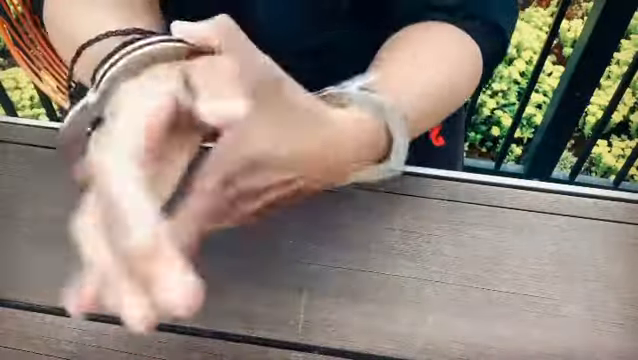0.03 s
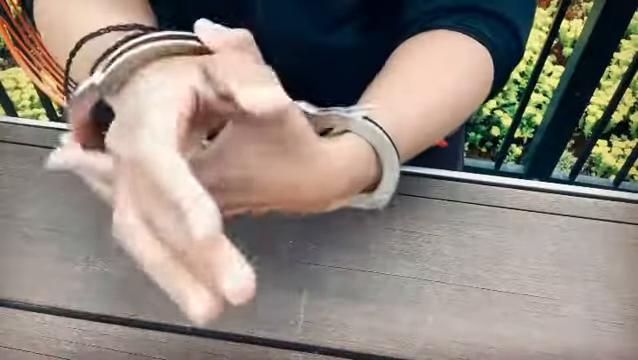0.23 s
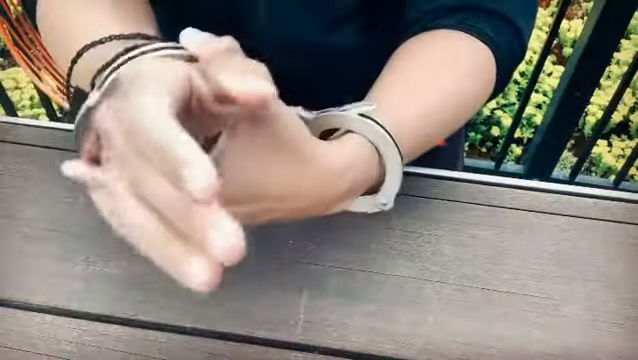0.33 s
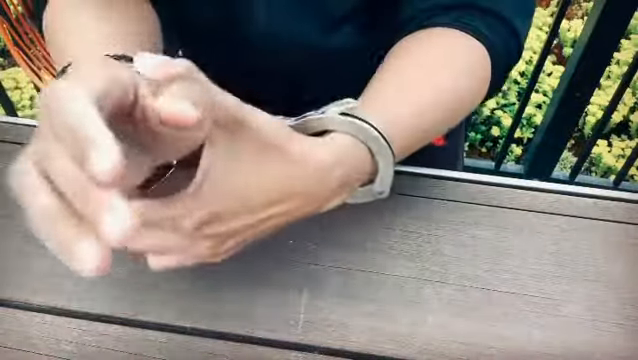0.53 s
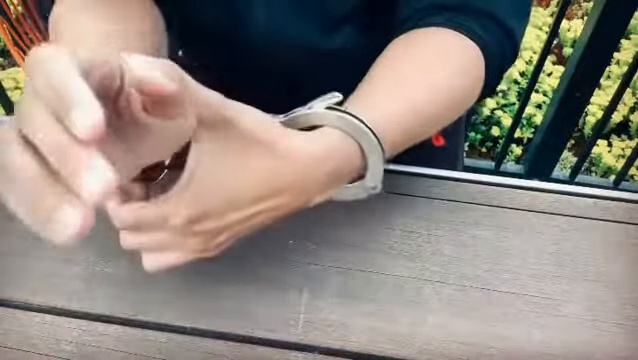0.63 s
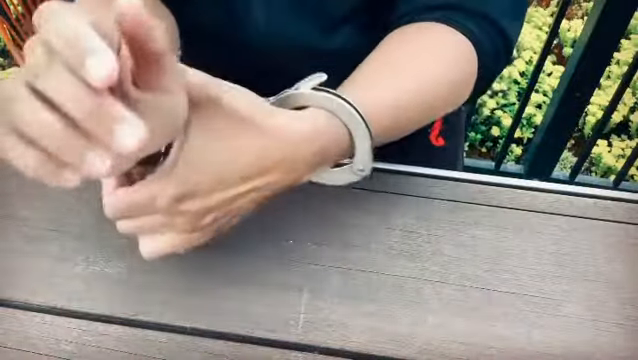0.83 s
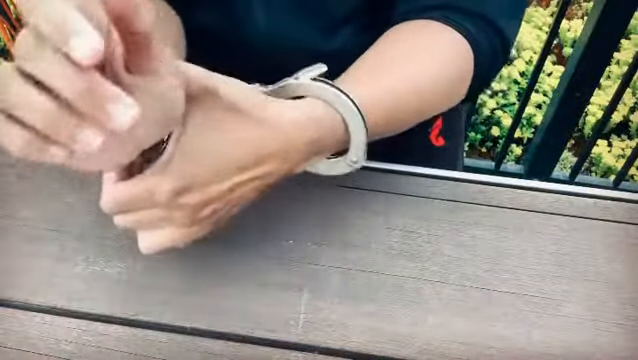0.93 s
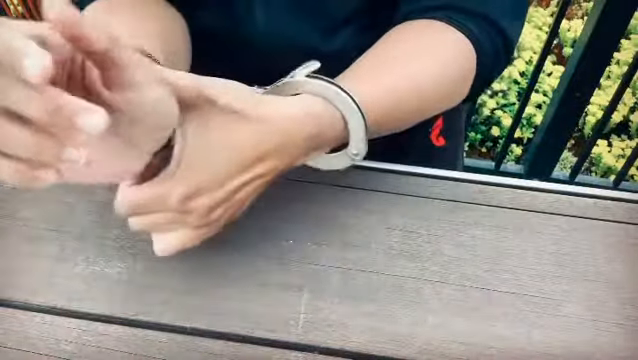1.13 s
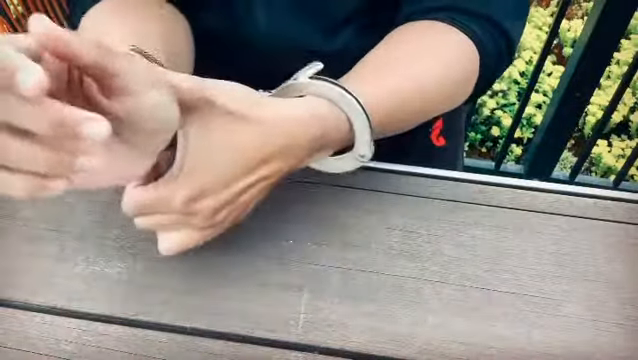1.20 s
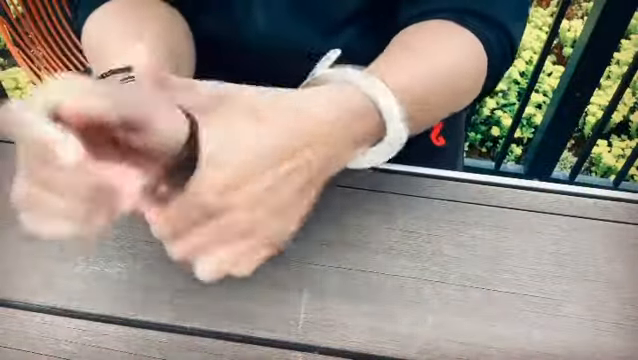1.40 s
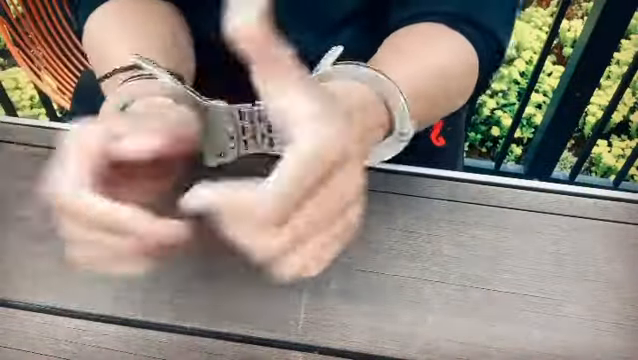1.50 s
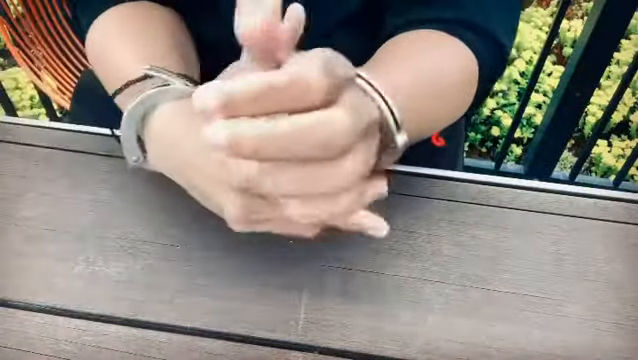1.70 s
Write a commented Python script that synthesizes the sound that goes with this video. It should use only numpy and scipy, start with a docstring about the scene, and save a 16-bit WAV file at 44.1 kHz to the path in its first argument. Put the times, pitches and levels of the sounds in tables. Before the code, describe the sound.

Steel handcuff clicks rattle off in fast dry bursts, with faint hinge ticks between, outdoors

```python
"""Handcuff ratchet clicks.

Steel handcuffs on moving wrists above a wooden table outdoors, close to a small microphone.
Pawl clicks: slide, snap and chatter noise rings steel modes; a low crack and table modes add the knock.
Hinge: sparse ticks through the same modes, plus lone decaying sine pings. Steel gets a short noise echo.
Background: flickering noise bands for outdoor air, wavering sine tones for a distant machine hum.
"""
import sys
import numpy as np
from scipy import signal
from scipy.io import wavfile
from scipy.ndimage import uniform_filter1d

SR = 44100
rng = np.random.default_rng(int(sys.argv[2]) if len(sys.argv) > 2 else 0)


def master(y):
    """Save y as 16-bit WAV."""
    cut = np.clip(np.atleast_2d(y).T, -1, 1)
    pcm = np.round(cut * 32767)  # scale
    wavfile.write(sys.argv[1], SR, pcm.astype(np.int16))


N = 77175

# ratchet clicks: strike_s, treble_db, mid_db, crack_db, knock_db, brightest_hz, chatter_s
CLICKS = [(0.23, -20, -28, -29, -23.0, 5720, 0.0048), (0.2378, -16.5, -32, -22.5, -17.5, 6000, 0.0039),
          (0.2479, -21.5, -23.5, -26.0, -24, 6200.0, 0.0054),
          (0.265, -18, -23.5, -34.5, -32.0, 6520.0, 0.0063),
          (0.2732, -17, -28.5, -41, -32.0, 6480.0, 0.0055), (0.2826, -21.5, -27, -46, -36.5, 6100, 0.0049),
          (0.2945, -19.5, -29.5, -36, -31.5, 6250.0, 0.0054), (0.305, -17.5, -37, -34.5, -27, 5870, 0.0047),
          (0.3179, -23, -31.5, -44.5, -40, 6180, 0.0048), (0.3295, -18.5, -30, -45, -51.5, 6770, 0.0058),
          (0.3398, -15, -29.5, -52, -56, 6450.0, 0.0052), (0.3494, -13, -37.5, -61, -54.5, 6460.0, 0.0064),
          (0.3582, -17.5, -32.5, -57.5, -62.5, 6360.0, 0.0061),
          (0.388, -17.5, -30.5, -57.5, -55, 6570, 0.0063),
          (0.5304, -26.5, -36.5, -60.5, -63, 6210.0, 0.0054), (0.537, -21, -34, -51.5, -67, 6370.0, 0.0054),
          (0.5424, -17.5, -33.5, -50, -70, 6240.0, 0.0042),
          (0.5495, -18.5, -30.5, -46.5, -68, 6130.0, 0.0068),
          (0.5616, -18.5, -33, -47.5, -55, 6060, 0.0056), (0.6026, -19.5, -29.5, -60, -54, 6250.0, 0.0044),
          (0.9724, -21, -27.5, -68, -54, 6370.0, 0.0057), (0.9808, -21, -28, -52.5, -54.5, 6140.0, 0.0047),
          (1.0115, -20, -27.5, -42, -47.5, 6080, 0.0062), (1.0222, -17.5, -28, -32, -36.5, 7030, 0.0075),
          (1.048, -20, -24, -37.5, -50, 6360, 0.0089), (1.0592, -15, -26.5, -41.5, -43.5, 6600, 0.0054),
          (1.0836, -19, -24.5, -46.5, -61.5, 6660, 0.0054), (1.1206, -20, -30, -53.5, -50, 6600, 0.0067)]
# faint hinge rustles: start_s, length_s, level_db, brightest_hz
RUSTLES = [(.005, 0.0086, -53.5, 6300), (0.022, 0.054, -67.5, 6240), (0.055, .005, -47.5, 6300),
           (0.062, 0.011, -55.5, 6200), (0.072, 0.0066, -45.5, 6200), (.083, 0.0035, -43, 6300),
           (.088, 0.0098, -51.5, 6500), (0.217, 0.004, -54.5, 5960), (0.959, 0.017, -57, 5030),
           (1.106, .008, -52, 6530), (1.111, .004, -37, 6740), (1.115, 0.0017, -30.5, 6450),
           (1.123, 0.011, -42, 6330), (1.241, 0.0037, -56.5, 6070), (1.26, 0.032, -68, 6050),
           (1.295, .004, -53, 6000), (1.32, .008, -46, 6900), (1.328, 0.0074, -47, 6700),
           (1.335, .005, -41.5, 6400), (1.343, .010, -53.5, 6440)]
# cuff modes before scatter and grip: pitch_hz, relative_db, t60_s
CUFF_MODES = [(2080, -23.5, .008), (2600, -13.5, 0.0027), (3025, -13, 0.0039), (3390, -10.5, .006),
              (3750, -11, 0.0087), (4210, -11, 0.0026), (4880, -9.5, 0.0085), (5360, -8.5, 0.0058),
              (5914, -4, 0.0092), (6100, -6, 0.0069), (6530, -0.5, 0.01), (6747, 0, 0.0044),
              (6984, -1, 0.021), (7403, -1, 0.0026)]
# table top modes: pitch_hz, relative_db, t60_s
TABLE_MODES = [(115, -1.5, .04), (172, 2.5, 0.041), (280.4, 0, 0.031), (383, -10.5, 0.036),
               (560, 0.5, 0.0092), (750, -3, .01), (950, -13, .008)]
# lone hinge pings: start_s, pitch_hz, level_db (before fade-in), t60_s
PINGS = [(.004, 1760, -50.5, 0.046), (.004, 2180, -61.5, 0.21), (.006, 4630, -58, 0.084),
         (.075, 1670, -55, 0.29), (.088, 3790, -51, 0.051), (1.244, 6170, -37, 0.024),
         (1.244, 4200, -52, .015), (1.253, 3970, -65, .1), (1.293, 5730, -43, 0.048),
         (1.293, 6270, -35, 0.02), (1.334, 4900, -46, .04)]
# outdoor noise spectrum: pitch_hz, relative_db (per Hz)
AIR = [(30, -29.5), (60, -18.5), (100, -9), (200, -10), (350, -1.5), (650, -7), (900, -14.5), (2000, -22.5),
       (4500, -38.5), (6800, -25.5), (9000, -55)]
# machine hum tones: pitch_hz, drift_hz (rms), level_db (rms)
HUM = [(344.7, 3, -63), (568.7, 11, -62.5), (679, 4, -62.5), (205.3, 12, -70)]

# pawl slides off the tooth and strikes
LEAD_S, SLIDE_S, SNAP_S, SNAP_FALL_S = 0.002, 0.0006, 0.00046, 0.0004
SLIDE_DB, STRIKE_DB, EDGE_DB = -14.5, 13.5, -19  # edge: unringing, re treble
# pawl chatters until it seats
CHATTER_DB, CHATTER_FALL_DB, CHATTER_PATCHY_DB, MID_CHATTER_DB = -7.5, 14.5, 4, -18
SEAT_S = 0.0008
# steel ring
SPLIT_HZ, STEEL_LOW_HZ = 4500, 1820  # mid/treble split; the steel carries little below this
BRIGHT_DB, BRIGHT_WIDTH_HZ = 5.5, 460
MODE_SCATTER_DB, MODE_JITTER_RATIO, GRIP_T60_S = 1.5, 0.025, 0.0065
# table crack and knock
CRACK_HZ, CRACK_WIDTH_HZ, KNOCK_PUSH_S = 1200, 680, 0.0004
# durations over which burst levels hold
CLICK_LEVEL_S, KNOCK_LEVEL_S = 0.0057, 0.008
# hinge
RUSTLE_TICKS_PER_S, RUSTLE_SCATTER_DB, RUSTLE_MID_DB = 2200, 3, -7
# short echoes from table and railing
TAIL_DB, TAIL_T60_S = -28, 0.12
TAIL_MID_HZ, TAIL_MID_WIDTH_HZ, TAIL_MID_DB = 2400, 1500, 23.5
# background
AIR_DB, AIR_FLICKER_DB, HUM_WAVER_DB = -56, 2, 3.5
# recording chain
BASS_CUT_HZ, ROLL_HZ, LEAK_DB, TOP_HZ = 60, 7286, -27, 8500


def undb(db):
    """Decibels to amplitude ratio."""
    return 10 ** (np.asarray(db) / 20)


def level(x, db):
    """Scale x to an rms level in dB."""
    return x * undb(db) / np.sqrt(np.mean(x ** 2))


def burst(x, db, length_s):
    """Scale x so that its energy spread over length_s has rms level db."""
    return x * undb(db) * np.sqrt(length_s * SR / np.sum(x ** 2))


def band(x, hz, width_hz):
    """Resonant band-pass."""
    return signal.lfilter(*signal.iirpeak(hz, hz / width_hz, fs=SR), x)


def two_pass_band(x, hz, width_hz):
    """Same resonance twice in series, for steeper skirts."""
    return band(band(x, hz, width_hz), hz, width_hz)


def slow_noise(shape, window):
    """Twice-smoothed noise at unit rms."""
    x = rng.standard_normal(shape)
    return level(uniform_filter1d(uniform_filter1d(x, window), window), 0)


def add(out, start_s, x):
    """Mix x into out at start_s."""
    i = int(start_s * SR)
    out[i:i + len(x)] += x[:N - i]


def ring(modes, extra_db, phase=0.):
    """Impulse responses of exponentially decaying sine modes, one row each."""
    hz, db, t60_s = np.array(modes, float).T[:, :, None]
    t = np.arange(4096) / SR
    gain = undb(db + np.reshape(extra_db, (-1, 1)))
    decay = np.exp(-np.log(1000) * t / t60_s)
    return gain * decay * np.sin(2 * np.pi * hz * t + phase)


def cuff_ring(bright_hz):
    """Mid and treble steel responses: boosted near bright_hz, damped by grip, scattered per call."""
    modes = np.array(CUFF_MODES, float)
    count = len(modes)
    hz = modes[:, 0].copy()
    boost_db = BRIGHT_DB * np.exp(-((hz - bright_hz) / BRIGHT_WIDTH_HZ) ** 2)
    modes[:, 0] *= 1 + MODE_JITTER_RATIO * rng.standard_normal(count)
    modes[:, 2] = np.minimum(modes[:, 2], GRIP_T60_S)
    rows = ring(modes, boost_db + MODE_SCATTER_DB * rng.standard_normal(count))
    rows *= (-1.) ** np.arange(count)[:, None]  # alternate polarity
    return rows[hz < SPLIT_HZ].sum(axis=0), rows[hz >= SPLIT_HZ].sum(axis=0)


def chatter_envelope(t, length_s):
    """Pawl bounce after the strike: falling, patchy gain until length_s."""
    patches = level(uniform_filter1d(rng.standard_normal(len(t)), 40), 0)
    gain_db = CHATTER_DB - CHATTER_FALL_DB * t / length_s + CHATTER_PATCHY_DB * patches
    return (t > 0) * (t < length_s) * undb(gain_db)


def table_knock(t):
    """A short smooth push drives the table top modes."""
    push = np.exp(-(t / KNOCK_PUSH_S - 1) ** 2)
    table = ring(TABLE_MODES, np.zeros(len(TABLE_MODES)), np.pi / 2).sum(axis=0)
    return signal.fftconvolve(push, table)


def clicks():
    """Slide, snap and chatter ring the steel at each tooth; crack and knock go into the table."""
    steel, wood = np.zeros(N), np.zeros(N)
    t = np.arange(640) / SR - LEAD_S  # zero at the strike
    knock = table_knock(t)
    rise = np.minimum(t, 0) / SLIDE_S
    fall = np.maximum(t - SNAP_S, 0) / SNAP_FALL_S
    snap = np.exp(rise - fall) * undb(SLIDE_DB * (t < 0))
    for strike_s, treble_db, mid_db, crack_db, knock_db, bright_hz, chatter_s in CLICKS:
        start_s = strike_s - LEAD_S
        noise = rng.standard_normal(640)
        noise[int(LEAD_S * SR)] = undb(STRIKE_DB)
        chatter = chatter_envelope(t, chatter_s)
        seat = np.exp(-np.maximum(t - chatter_s, 0) / SEAT_S)  # seated pawl stills the ring
        mid_ring, treble_ring = cuff_ring(bright_hz)

        treble = signal.fftconvolve((snap + chatter) * noise, treble_ring)[:640] * seat
        mid_drive = (snap + undb(MID_CHATTER_DB) * chatter) * noise
        mid = signal.fftconvolve(mid_drive, mid_ring)[:640] * seat
        edge = np.diff(snap * noise)
        crack = two_pass_band(snap * noise, CRACK_HZ, CRACK_WIDTH_HZ)

        add(steel, start_s, burst(treble, treble_db, CLICK_LEVEL_S))
        add(steel, start_s, burst(mid, mid_db, CLICK_LEVEL_S))
        add(steel, start_s, burst(edge, treble_db + EDGE_DB, CLICK_LEVEL_S))
        add(wood, start_s, burst(crack, crack_db, CLICK_LEVEL_S))
        add(wood, start_s, burst(knock, knock_db, KNOCK_LEVEL_S))
    high_pass = signal.butter(6, STEEL_LOW_HZ, "high", fs=SR, output="sos")
    return signal.sosfilt(high_pass, steel), wood


def rustles():
    """Tiny random ticks of sliding steel ring the cuff modes."""
    out = np.zeros(N)
    for start_s, length_s, level_db, bright_hz in RUSTLES:
        chance, size = rng.random((2, 2048))
        ticks = (chance < RUSTLE_TICKS_PER_S / SR) * undb(-RUSTLE_SCATTER_DB * np.log(size + 1e-9))
        ticks[0] = 1  # at least one tick
        ticks *= np.exp(-(np.arange(2048) / (length_s * SR)) ** 3)
        mid_ring, treble_ring = cuff_ring(bright_hz)
        rustle = signal.fftconvolve(ticks, treble_ring + undb(RUSTLE_MID_DB) * mid_ring)
        add(out, start_s, burst(rustle, level_db, length_s))
    return out


def pings():
    """Single decaying hinge modes with a short linear fade-in."""
    out = np.zeros(N)
    fade_in = np.minimum(np.arange(4096) / 60, 1)
    for start_s, hz, level_db, t60_s in PINGS:
        add(out, start_s, ring([(hz, level_db, t60_s)], 0)[0] * fade_in)
    return out


def short_echo(steel):
    """Steel convolved with decaying noise that is stronger in the middle."""
    t = np.arange(8192) / SR
    noise = rng.standard_normal(8192)
    noise = noise + undb(TAIL_MID_DB) * band(noise, TAIL_MID_HZ, TAIL_MID_WIDTH_HZ)
    echo = noise * np.exp(-np.log(1000) * t / TAIL_T60_S)
    echo /= np.sqrt(np.sum(echo ** 2))
    return undb(TAIL_DB) * signal.fftconvolve(steel, echo)[:N]


def machine_hum():
    """Sine tones wavering slowly in pitch and level."""
    out = np.zeros(N)
    for hz, drift_hz, level_db in HUM:
        waver, drift = slow_noise((2, N), 2000)
        tone = np.sin(2 * np.pi * np.cumsum(hz + drift_hz * drift) / SR)
        out += level(undb(HUM_WAVER_DB * waver) * tone, level_db)
    return out


def outdoor_air():
    """Noise bands at half-octave spacing, each flickering in level."""
    out = np.zeros(N)
    air_hz, air_db = np.array(AIR).T
    for hz in 40 * 2 ** np.arange(0, 8, .5):
        noise = two_pass_band(rng.standard_normal(N), hz, hz / 2)
        band_db = np.interp(np.log(hz), np.log(air_hz), air_db)
        out += noise * undb(band_db + AIR_FLICKER_DB * slow_noise(N, 3000))
    return level(out, AIR_DB)


def scene():
    """Cuffs, their short echo, table and background."""
    steel, wood = clicks()
    steel = steel + rustles() + pings()
    mix = steel + wood + short_echo(steel) + machine_hum() + outdoor_air()
    return mix[None]


def record(dry):
    """Deep bass is cut; the treble rolls off sharply, only a trace passing above."""
    dry = signal.sosfilt(signal.butter(2, BASS_CUT_HZ, "high", fs=SR, output="sos"), dry)
    soft = signal.sosfiltfilt(signal.butter(20, ROLL_HZ, fs=SR, output="sos"), dry)
    leaky = soft + undb(LEAK_DB) * dry
    return signal.sosfilt(signal.butter(2, TOP_HZ, fs=SR, output="sos"), leaky)


dry = scene()
out = record(dry)
master(out)
```